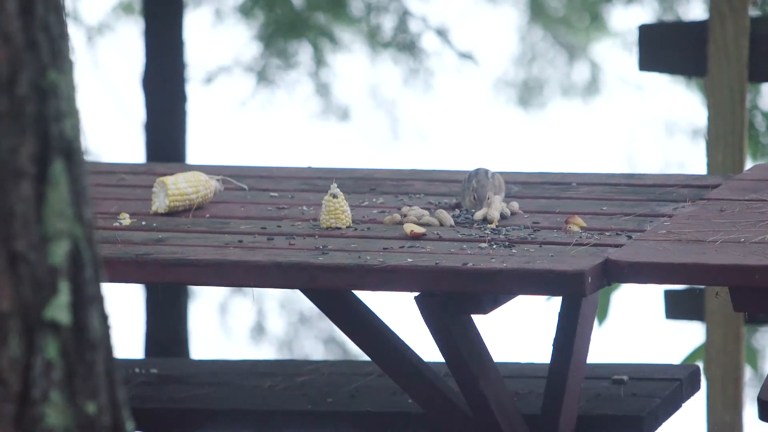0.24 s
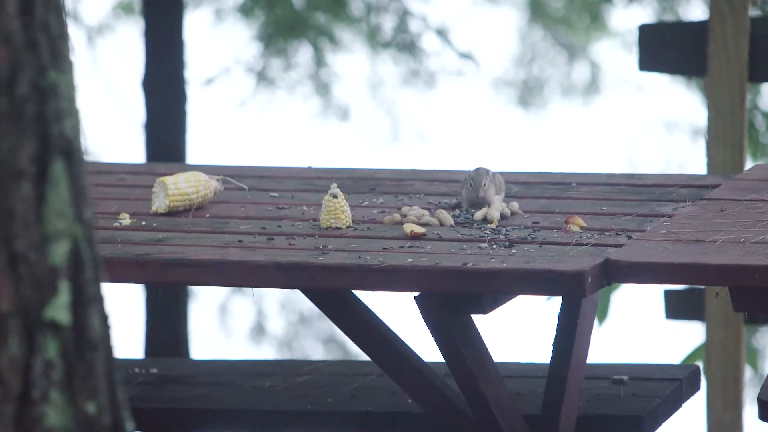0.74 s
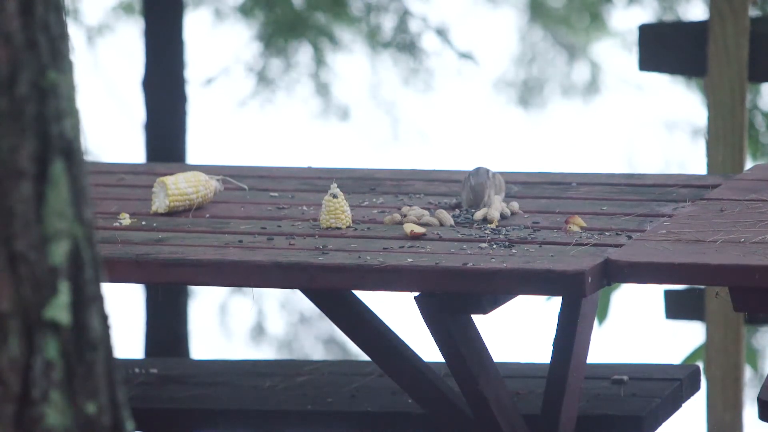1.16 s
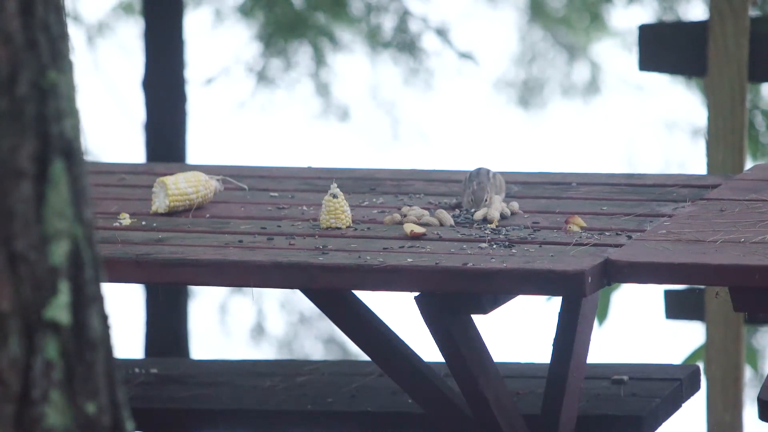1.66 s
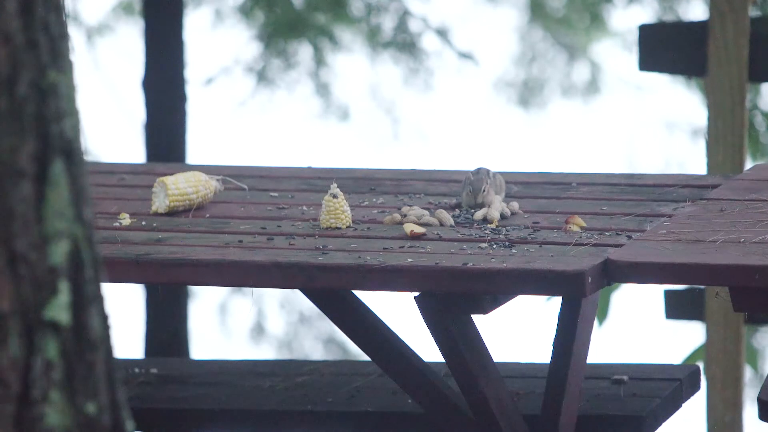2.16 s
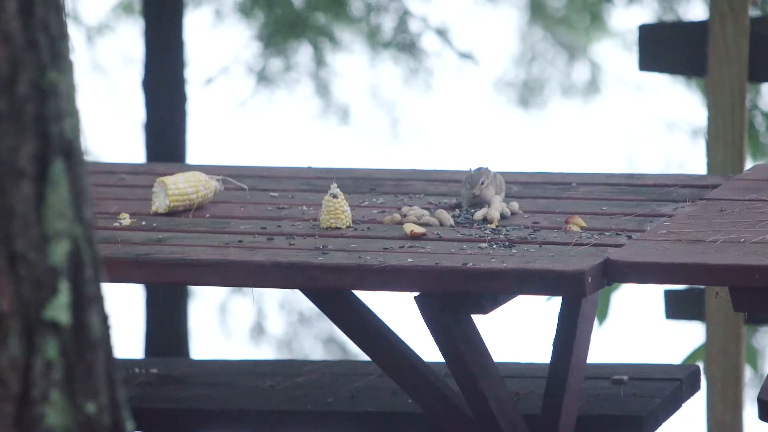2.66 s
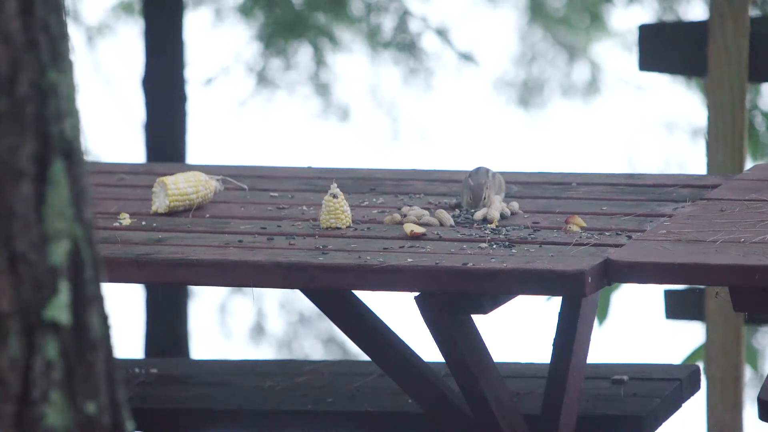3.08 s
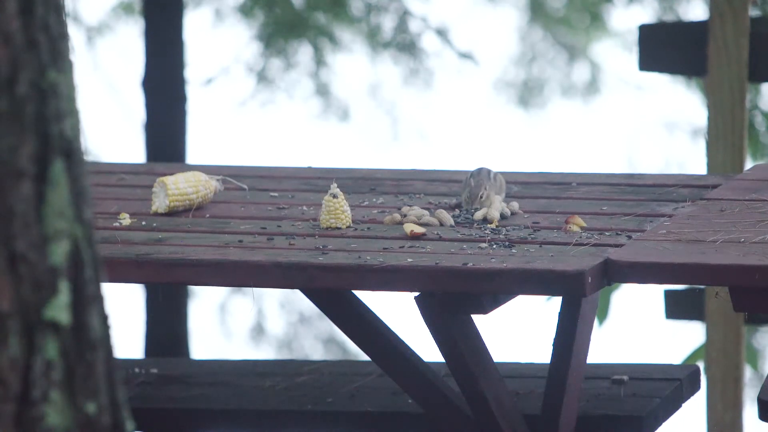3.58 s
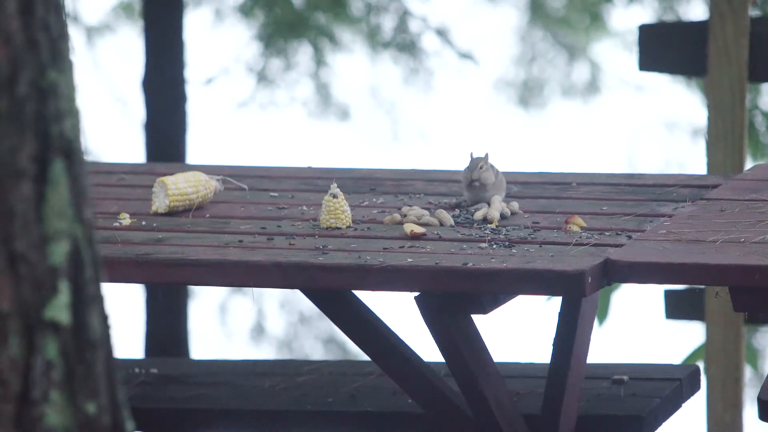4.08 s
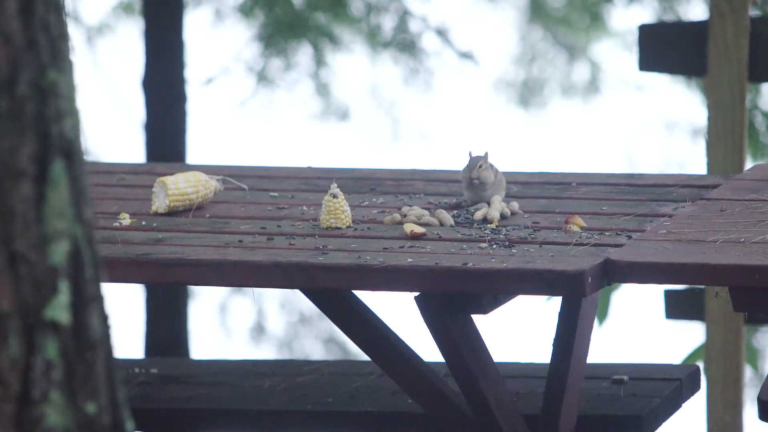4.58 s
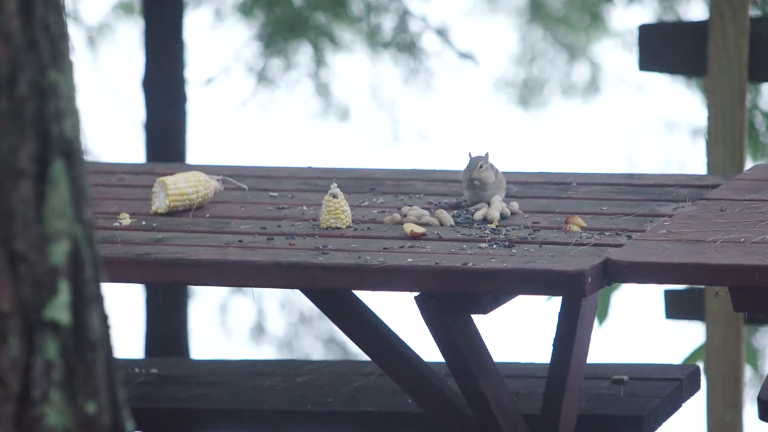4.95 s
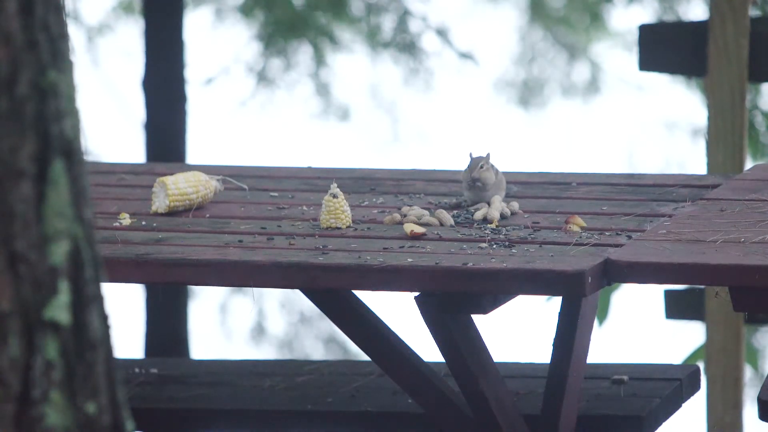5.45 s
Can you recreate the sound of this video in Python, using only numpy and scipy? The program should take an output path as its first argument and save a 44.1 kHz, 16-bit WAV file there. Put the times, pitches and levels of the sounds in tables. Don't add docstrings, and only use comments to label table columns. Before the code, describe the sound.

A chipmunk gives sharp, high, uneven chips among trees, with three brief raspy squeals, hollow wooden knocks, wind buffeting and soft hiss.

```python
import sys
import numpy as np
from scipy import signal
from scipy.fft import rfft, irfft, next_fast_len
from scipy.io import wavfile
from scipy.ndimage import uniform_filter1d

SR = 44100
rng = np.random.default_rng(int(sys.argv[2]) if len(sys.argv) > 2 else 0)


def unload_audio(sound):
    columns = np.transpose(np.atleast_2d(sound))
    steps = np.round(np.clip(columns, -1, 1) * 32767)
    wavfile.write(sys.argv[1], SR, steps.astype(np.int16))


def invert_db(level):
    return 10 ** (np.asarray(level, dtype=float) / 20)


N = 252252

# (time [s], length [s], top pitch [Hz], share of pitch lost at the ends, level [dB])
HIDDEN_CHIPS = [(.116, 0.023, 6580, 0.32, -50.5), (.52, 0.053, 6320, 0.2, -50),
                (.743, 0.036, 6280, 0.22, -47), (1.398, 0.035, 6130, .25, -58),
                (1.687, 0.059, 6350, 0.36, -50.5), (1.953, 0.0699, 6450, 0.46, -50.5),
                (2.24, 0.047, 5930, 0.51, -52), (2.528, 0.032, 6300, 0.22, -52),
                (2.964, 0.05, 6750, 0.211, -52), (3.156, 0.034, 6620, 0.24, -53.5),
                (3.172, 0.021, 6050, 0.086, -52), (3.353, 0.07, 6870, 0.35, -58),
                (3.378, 0.046, 6091, 0.052, -55), (3.576, 0.07, 6860, 0.283, -55.5),
                (3.835, 0.039, 7010, 0.21, -50), (4.53, 0.021, 6500, 0.117, -65),
                (4.534, 0.023, 5900, 0.0426, -50), (4.66, 0.044, 6050, .16, -59.5),
                (4.715, 0.04, 5850, 0.13, -65), (4.888, 0.069, 6500, 0.19, -59.5),
                (5.268, 0.025, 6750, 0.25, -50.5), (5.54, 0.033, 6550, 0.274, -54),
                (5.562, 0.021, 5934, 0.064, -51.5)]
# (time [s], length [s], top pitch [Hz], share of pitch lost at the ends, level [dB])
NEAR_CHIPS = [
    (1.191, .014, 3303, 0.081, -55.5),
    (1.196, 0.039, 5076, 0.195, -45),
    (2.768, 0.028, 3250, 0.4, -58),
    (2.785, 0.035, 4546, 0.21, -46),
    (2.787, 0.048, 6310, 0.21, -50.5),
    (4.251, 0.035, 4660, 0.432, -47.5),
]
# (time [s], length [s], top pitch [Hz], share of pitch lost, level [dB])
FAR_CHIPS = [
    (.88, .07, 7640, .027, -78),
    (.91, .06, 5550, 0.0253, -76),
    (.98, .13, 7673, .027, -75.5),
    (1.133, 0.0253, 5500, 0.032, -68),
    (2.4, .028, 5560, .055, -80),
    (3.29, 0.0386, 5600, 0.14, -66),
    (3.708, .028, 5620, 0.051, -67.5),
    (4.085, 0.013, 5730, 0.041, -64.5),
    (5.11, 0.011, 5630, 0.04, -62),
]
# (pitch [Hz], left minus right [dB])
CHIP_LEAN = [(3300, -2), (5000, -5.5), (5900, 0), (6350, 1), (6900, 2)]
# (lowest, highest [Hz])
RASP_BAND = (8900, 13100)
# (time [s], length [s], pitch [Hz])
WHINE = (0.12, 0.034, 3050)
# (multiple of the pitch, level [dB])
WHINE_PARTIALS = [(1, -67), (2, -55.5), (3, -61), (4, -62.5)]

# (time [s], length [s], effort [dB], pitch [Hz], chest [dB])
SQUEALS = [
    (1.242, 0.078, -42.5, 3048, 0.5),
    (2.832, 0.085, -42, 3070, -2),
    (4.295, 0.09, -42, 2990, -1),
]
BEAT_DB = (7, -7.5, -18)
ROUGHNESS = (0.76, 0.613, 0.39)
# (frequency [Hz], level per Hz [dB])
THROAT = [(350, -25), (900, -11.5), (2300, -8), (5600, -2.5), (7080, -14.5), (12000, -10.5), (13600, -20),
          (15600, -18)]
# (frequency [Hz], width [Hz], level [dB], opens after [s], dies [dB per s])
CAVITIES = [(1050, 310, -7.5, 0.00676, -350), (1370, 570, -6, 0.0093, -300), (3000, 680, -1, 0.0063, -20),
            (4280, 690, -7, 0.008, -150), (5550, 590, 1, 0.019, -150), (8800, 1700, -11.5, 0.041, -39),
            (10980, 780, -7, 0.0055, -150), (11950, 790, -1, .004, -330)]
# (frequency [Hz], left minus right [dB])
SQUEAL_LEAN = [(3000, 1), (5600, -1.5), (8000, 4.5), (12000, 4.5)]

# (time [s], peak [dB], ring [Hz], left minus right [dB], sharp tick [dB])
KNOCKS = [
    (0.161, -38, 414.5, -9, -17.5),
    (0.539, -53.5, 366, -19.5, -20),
    (1.132, -52, 392, -5.5, -22),
    (1.284, -48.5, 447, 1, -22),
    (2.739, -34.5, 361, -12.5, -33.5),
    (3.1352, -32, 410, -7.5, -18.5),
    (4.984, -63, 363, -10, -2),
    (5.59, -49, 502, -3.5, 0),
]
# (factor on the ring pitch, level [dB], time to fall 60 dB [s])
BOARD_MODES = [(1, 1.5, 0.11), (1.6, -18, 0.075), (1.2, -8, 0.12), (2.3, -27, 0.072)]
# (time [s], peak [dB], pitch [Hz], left minus right [dB], time to fall 60 dB [s])
TICKS = [(0.137, -54.5, 10000, 9, 0.071), (5.59, -52.5, 655, -10.5, 0.14), (3.355, -61.5, 1560, 1, 0.25),
         (.17, -50.5, 2440, -5, 0.042), (0.3785, -54.5, 10400, 9, 0.0079), (0.749, -57, 7450, 4.5, 0.0065),
         (0.855, -59, 4370, -8, .008), (2.3733, -49.5, 1900, 3, 0.014), (2.736, -52.5, 1090, -8, 0.018),
         (3.022, -60, 9500, 12, 0.0062), (3.0557, -53.5, 10000, 18, 0.0066), (3.071, -52, 10140, 9.5, .005),
         (3.352, -48.5, 1296, -9.5, 0.072), (3.358, -58.5, 3900, -6, 0.0107),
         (3.975, -60, 8070, 2.5, 0.0065), (3.976, -55, 4460, -12, 0.0068), (4.0258, -57, 10200, -1, 0.0065),
         (4.647, -55, 4300, -14, 0.0087), (5.136, -55.5, 2130, -10.5, 0.016),
         (5.396, -54.5, 1570, -9, 0.092), (5.396, -55.5, 5020, -4, 0.0237), (5.57, -53, 3340, 7.5, 0.061),
         (5.579, -58, 2460, 17, 0.0184), (5.604, -50, 3020, 5, 0.0147)]

# (time [s], length [s], middle pitch [Hz], level [dB])
FALLING_NOTES = [
    (.762, 0.0094, 3030, -64.5),
    (2.02, .012, 3180, -71),
    (3.307, 0.0136, 3430, -66),
]
# (time [s], length [s], middle pitch [Hz], level [dB])
ARCHED_NOTES = [
    (2.14, 0.022, 3970, -66),
    (2.479, .032, 4150, -71),
    (2.624, .025, 4100, -69),
]
# (time [s], length [s], middle pitch [Hz], level [dB])
RISING_NOTES = [(4.615, 0.023, 4000, -70), (4.742, 0.007, 3000, -67), (4.762, 0.0204, 3850, -68),
                (4.84, 0.0295, 3963, -71), (4.92, 0.024, 4080, -70), (4.995, 0.022, 3946, -69),
                (5.073, 0.02, 3967, -69), (5.241, 0.0156, 3050, -65.5), (5.375, 0.017, 2980, -64),
                (5.506, 0.0176, 2970, -63), (5.641, 0.0216, 3170, -65.5)]

# (frequency [Hz], time to fall 60 dB [s])
TREE_ECHO = [(300, 0.26), (3000, 0.49), (6500, 0.39), (13000, 0.29)]

# (time [s], peak [dB], half width [s], left minus right [dB])
GUSTS = [(.2, -46.5, 0.05, 19), (0.279, -41, 0.031, 22), (.6, -44, 0.028, 7), (.68, -45, 0.099, 2),
         (0.742, -29.5, 0.038, 32), (1.03, -47.5, 0.0405, 3), (1.099, -32, 0.0567, 17.5),
         (1.34, -44.5, 0.072, 1), (1.419, -40.5, 0.044, 7), (1.74, -50, 0.1, -1), (2.05, -41.5, 0.07, 10),
         (2.24, -48, 0.069, 16), (2.36, -42.5, 0.105, -3.5), (2.46, -41.5, 0.088, -1.5),
         (2.6, -48.5, 0.048, 11), (2.712, -36.5, 0.033, 16), (2.791, -25.5, 0.028, 21),
         (2.919, -33, 0.046, 7), (3.009, -23, 0.02, 17), (3.082, -32, 0.081, 8), (3.164, -28.5, 0.034, 4.5),
         (3.236, -34.5, 0.058, 20), (3.351, -35.5, 0.032, 5), (3.47, -46, 0.021, 17),
         (3.57, -44, 0.053, 10), (3.68, -45.5, 0.047, -12), (3.79, -51, .04, -15), (5.3, -51.5, .1, 8),
         (5.44, -48.5, 0.058, 6), (5.7, -57, 0.108, 20)]
# (frequency [Hz], level per Hz [dB])
WIND_TONE = [(8.8, -35), (15, 6), (32, 6.5), (55, -5), (107, -21.5), (127, -37), (146, -58), (200, -63),
             (260, -76), (440, -120)]
# (frequency [Hz], level per Hz [dB])
HISS_TONE = [(35, -18), (60, 4.5), (113, -2), (171, -5.5), (361, -13.5), (778, -14.5), (982, -14.5),
             (2320, -22.5), (3000, -21.5), (4680, -26), (5500, -25), (7110, -31.5), (12400, -34.5),
             (14000, -38), (15700, -37.5)]
# (frequency [Hz], 1 = the same, 0 = unrelated)
HISS_LIKENESS = [(60, 0.93), (180, 0.4), (550, 0.37), (1650, 0.54), (4970, 0.56), (15000, -0.19)]
# (frequency [Hz], left minus right [dB])
HISS_LEAN = [(60, -4), (180, -3.5), (550, -1), (1650, -1.5), (4970, -1), (15000, -1)]

# (frequency [Hz], distance under the loudest lower band [dB])
MASKING = [(5500, 60), (6500, 27.5), (8000, 28.5), (9200, 60), (12600, 60), (13300, 33), (15500, 35)]
# (frequency [Hz], least level against the band's usual level [dB])
FAINT_TREBLE = [(12500, -12), (13500, -3.2), (15000, -1), (15700, .5)]


def evened(x):
    return x / np.sqrt(np.mean(x ** 2) + 1e-20)


def read(points, hz):
    f, value = np.transpose(points)
    return np.interp(np.log(hz + 1), np.log(f + 1), value)


def colour(x, points, share=1):
    size = next_fast_len(x.shape[-1] + 2048)
    gain = invert_db(share * read(points, np.fft.rfftfreq(size, 1 / SR)))
    return irfft(rfft(x, size) * gain, size)[..., :x.shape[-1]]


def add(mix, s, sound, pan_db=0):
    part = mix[:, round(s * SR):][:, :sound.shape[-1]]
    sides = invert_db(np.array([[pan_db / 2], [-pan_db / 2]]))
    part += (sound * sides)[:, :part.shape[1]]


def wobble(size, span):
    once = uniform_filter1d(rng.standard_normal(size), span)
    return evened(uniform_filter1d(once, span))


def whistle(hz, overtone_db, edge, flutter):
    turns = np.cumsum(hz * (1 + flutter * wobble(len(hz), 30))) / SR
    tone = np.sin(2 * np.pi * turns) + invert_db(overtone_db) * np.sin(4 * np.pi * turns)
    shape = signal.windows.tukey(len(hz), edge)
    return np.sqrt(2) * tone * shape * invert_db(2.6 * wobble(len(hz), 90))


def chips(table, overtone_db, flutter, rise_db, fall_db, lean, square, rasp_db):
    out = np.zeros((2, N))
    band = signal.butter(3, RASP_BAND, "bandpass", fs=SR, output="sos")
    for s, length, top_hz, lost, db in table:
        u = np.linspace(-1, 1, round(length * SR))
        sag = lost * abs(u) ** np.where(u < 0, square, 1.096 * square)
        octave_db = overtone_db - 45 * abs(np.log2(top_hz / 6150)) + 60 * min(lost - .2, 0)
        strength = invert_db(-np.where(u < 0, rise_db, fall_db) * sag)
        tone = strength * whistle(top_hz * (1 - sag), octave_db, 0.032, flutter)
        rasp = evened(signal.sosfilt(band, rng.standard_normal(len(u))))
        call = tone + invert_db(rasp_db) * rasp * (1 - u ** 2)
        late = 2 * (top_hz > 5500)
        add(out, s, invert_db(db) * np.array([call, np.roll(call, late)]), read(lean, top_hz))
    return out


def whine():
    out = np.zeros((2, N))
    s, length, hz = WHINE
    for k, db in WHINE_PARTIALS:
        steady = np.full(round(length * SR), k * hz)
        add(out, s, invert_db(db) * whistle(steady, -60, 0.42, 0.0196), 5)
    return out


def resonate(x, hz, width):
    turn = np.exp(2j * np.pi * np.cumsum(hz) / SR)
    r = np.exp(-np.pi * width / SR)
    smooth = signal.lfilter([1], np.convolve([1, -r], [1, -r]), x / turn)
    return (turn * smooth).real


def squeals():
    hold_s, let_go_s, fade_db_per_s = 0.05, 0.0133, -290
    slack_sag = 0.05
    open_s, breadth_db, uneven_db = 0.0068, -3.5, 3
    stages = [0, hold_s, hold_s + let_go_s]
    out = np.zeros((2, N))
    for s, length, top_db, top_hz, chest_db in SQUEALS:
        t = np.arange(0, length, 1 / SR)
        beat_db = np.interp(t, stages, BEAT_DB)
        rough = np.clip(np.interp(t, stages, ROUGHNESS), 0, 1)
        sag = np.interp(t, stages, (0, 0, slack_sag))
        effort_db = top_db + fade_db_per_s * np.maximum(t - hold_s, 0)
        hz = top_hz * (1 - sag)
        turns = np.cumsum(hz * (1 + 0.119 * rough * wobble(len(t), 45))) / SR
        folds = sum(invert_db(beat_db * (k % 2)) * np.cos(np.pi * k * turns) for k in range(1, 11))
        puffs = (0.335 + np.exp(-(turns / 14 % 1) / 0.1)) * rng.standard_normal(len(t))
        drive = (1 - rough) * evened(folds) + rough * evened(puffs)
        voice = invert_db(breadth_db) * evened(colour(drive, THROAT))
        for f, width, db, opens, dies in CAVITIES:
            level_db = db - 8 + chest_db * (f < 2000) + dies * np.maximum(t - opens, 0)
            level_db = level_db + uneven_db * wobble(len(t), 200)
            opening = 1 / (1 + np.exp((opens - t) * 4 / open_s))
            voice = voice + evened(resonate(drive, f * (1 - sag), width)) * invert_db(level_db) * opening
        fades = np.minimum(t / 0.0095, 1) * np.minimum((length - t) / 0.027, 1)
        voice = voice * invert_db(effort_db) * fades
        add(out, s, np.array([colour(voice, SQUEAL_LEAN, 0.52), colour(voice, SQUEAL_LEAN, -0.32)]))
    body = signal.sosfiltfilt(signal.butter(2, 3800, fs=SR, output="sos"), out)
    return body + leaves(out - body, 0.02, 9.5)


def knocks():
    out, t = np.zeros((2, N)), np.arange(SR // 3) / SR
    dull = signal.butter(3, [300, 2600], "bandpass", fs=SR, output="sos")
    for s, db, hz, pan_db, tick_db in KNOCKS:
        ring = 0
        for f, mode_db, t60 in BOARD_MODES:
            woken_db = 0.4 * (tick_db + 14.5) * (f > 1)
            choke = invert_db(0.5 * (tick_db + 35.0) * (f == 1))
            ring = ring + invert_db(mode_db + woken_db - 60 * t / t60 * choke) * np.sin(2 * np.pi * hz * f * t)
        tick = signal.sosfilt(dull, rng.standard_normal(len(t)) * invert_db(tick_db + 11.5 - 60 * t / 0.0276))
        add(out, s - .003, invert_db(db) * (ring * (1 - np.exp(-t / 0.0029)) + tick), pan_db)
    return out


def ticks():
    out, t = np.zeros((2, N)), np.arange(SR // 8) / SR
    for s, db, hz, pan_db, t60 in TICKS:
        band = signal.butter(3, [hz * 0.62, min(hz * 1.29, 14000)], "bandpass", fs=SR, output="sos")
        burst = signal.sosfilt(band, rng.standard_normal(len(t)) * invert_db(-60 * t / t60))
        add(out, s, burst / abs(burst).max() * invert_db(db + 4.5), pan_db)
    return out


def bird():
    out = np.zeros((2, N))
    for notes, glide, bend in (FALLING_NOTES, -0.16, 0), (ARCHED_NOTES, 0, -0.303), (RISING_NOTES, 0.132, 0):
        for s, length, middle_hz, db in notes:
            u = np.linspace(-1, 1, round(length * SR))
            hz = middle_hz * (1 + glide * u + bend * u ** 2)
            add(out, s, invert_db(db) * whistle(hz, -28.5, 0.27, 0.0067), 2.5)
    return out


def leaves(x, t60, scatter_db):
    t = np.arange(2000) / SR
    paths = rng.standard_normal((2, len(t))) * (rng.random((2, len(t))) < .06) * invert_db(-60 * t / t60)
    paths = invert_db(scatter_db) * paths / np.linalg.norm(paths, axis=1)[:, None]
    paths[:, 0] = 1
    return signal.oaconvolve(x, paths / np.linalg.norm(paths, axis=1)[:, None], axes=1)[:, :N]


def trees(x, start=0.0051, build=0.002):
    taps = np.zeros((2, SR))
    at = np.arange(round(start * SR), SR - 40, 30) + rng.integers(0, 30, (2, 1))
    at = at + rng.integers(0, 10, at.shape)
    sizes = rng.standard_normal(at.shape) * invert_db(0.98 * rng.exponential(1, at.shape).clip(0, 4))
    np.put_along_axis(taps, at, sizes, 1)
    hz, t, z = signal.stft(taps, SR, nperseg=256)
    dying = invert_db(-60 * t / read(TREE_ECHO, hz)[:, None])
    tail = signal.istft(z * dying, SR, nperseg=256)[1][:, :SR]
    tail = tail * (1 - np.exp(-np.arange(SR) / SR / build))
    return signal.fftconvolve(x, tail / np.linalg.norm(tail, axis=1)[:, None], axes=1)[:, :N]


def wood(x, wet_db):
    turn = 2 * np.pi * np.arange(N) / SR * 0.885
    shares = [np.sqrt(2 / 3) * np.cos(turn + k * np.pi / 3) for k in range(3)]
    return x + invert_db(wet_db) * sum(trees(x * w) for w in shares)


def wind():
    t = np.arange(0, N + 64, 64) / SR
    strength = invert_db(-62.5) ** 2
    for s, db, half, pan_db in GUSTS:
        lean = invert_db(np.array([[pan_db], [-pan_db]]))
        swell = invert_db(db - 12.5 * abs((t - s) / half) ** 1.21)
        strength = strength + 4 * lean / lean.sum() * swell ** 2
    left, right = colour(rng.standard_normal((2, N)), WIND_TONE)
    swings = np.array([evened(left), evened(right + 0.099 * left)])
    power = np.sqrt(uniform_filter1d(swings ** 2, 3500, 1) + 0.03)
    gusts = np.array([np.interp(np.arange(N) / SR, t, np.sqrt(port)) for port in strength])
    return swings / power * gusts


def hiss():
    frames, hz = N // 256 + 5, np.fft.rfftfreq(1024, 1 / SR)
    a, b, c, d, patches = rng.standard_normal((frames, 513, 5)).T
    patches = evened(uniform_filter1d(uniform_filter1d(patches, 12, 0), 14, 1))
    same = np.clip(read(HISS_LIKENESS, hz), -1, 1)[:, None]
    left = a + 1j * b
    right = same * left + np.sqrt(1 - same ** 2) * (c + 1j * d)
    z = np.array([left, right])
    z = z * invert_db(read(HISS_TONE, hz)[:, None] + 1.2 * patches + .3 * wobble(frames, 12))
    z = z * invert_db(np.array([.5, -.5])[:, None, None] * read(HISS_LEAN, hz)[:, None])
    return invert_db(-56.5) * evened(signal.istft(z, nperseg=1024, noverlap=768)[1][:, :N])


def scene():
    far = chips(FAR_CHIPS, -24.0, 0.0117, 20, 18, [(5500, 2.1), (7600, 1.9)], 3.6, -30)
    hidden = chips(HIDDEN_CHIPS, -14, 0.009, 20, 22, CHIP_LEAN, 3.7, -15.5) + whine() + 0.5 * far
    near = chips(NEAR_CHIPS, -10, 0.0088, 30, 40, CHIP_LEAN, 4.16, -34)
    rasps = squeals()
    hits = ticks() + knocks()
    echoes = trees(far + 0.67 * near + 0.55 * rasps + 0.53 * hits + 0.233 * bird())
    clear = leaves(near + .9 * bird(), .02, -4.5)
    screened = leaves(hidden, .08, 11)
    return wood(screened, -4.5) + clear + rasps + hits + echoes + hiss() + wind()


def roll_off(x):
    return signal.sosfilt(signal.butter(12, 15800, fs=SR, output="sos"), x)


def record(dry):
    hz, _, z = signal.stft(dry, SR, nperseg=1024, noverlap=768)
    power = (abs(z) ** 2).sum(0)
    power = uniform_filter1d(uniform_filter1d(power, size=11, axis=0), size=3, axis=1)
    band_db = 10 * np.log10(abs(power) + 1e-20)
    calls_db = np.where(hz[:, None] > 5650, band_db, -200)
    loudest_db = np.maximum.accumulate(calls_db, axis=0)
    kept = band_db > loudest_db - read(MASKING, hz)[:, None]
    usual_db = np.median(band_db, axis=1, keepdims=True)
    kept &= band_db > usual_db + read(FAINT_TREBLE, hz)[:, None]
    below_edge = (hz < 15830)[:, None]
    masked = signal.istft(z * kept * below_edge, SR, nperseg=1024, noverlap=768)[1][:, :N]
    return roll_off(masked)


dry = scene()
out = record(dry)
unload_audio(out)
```